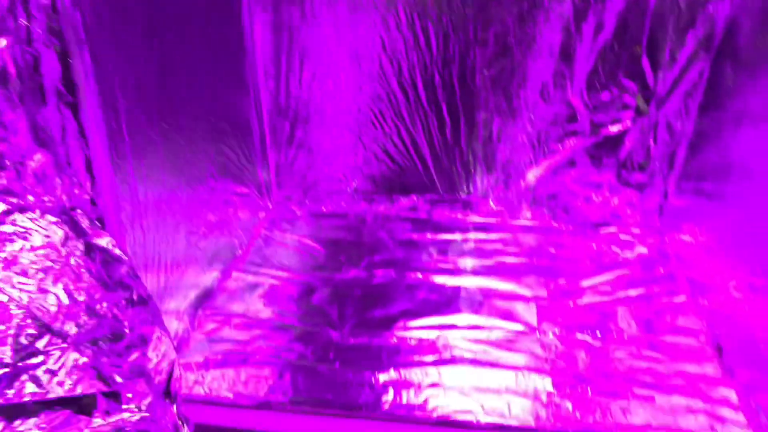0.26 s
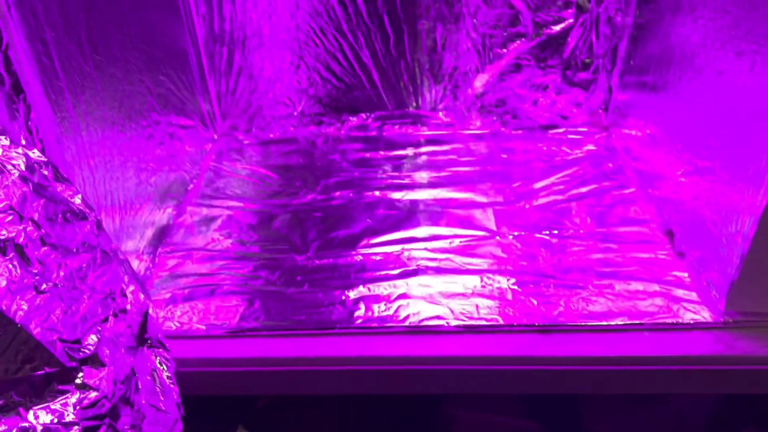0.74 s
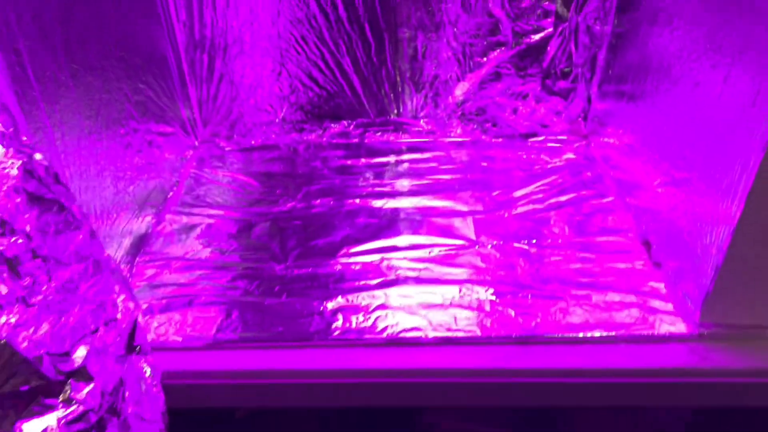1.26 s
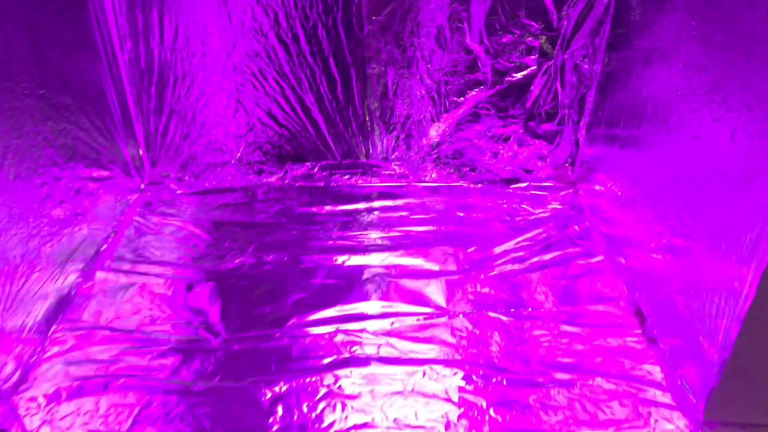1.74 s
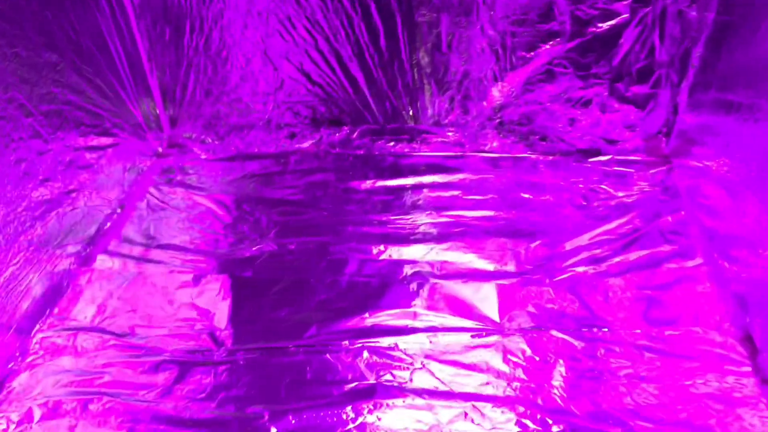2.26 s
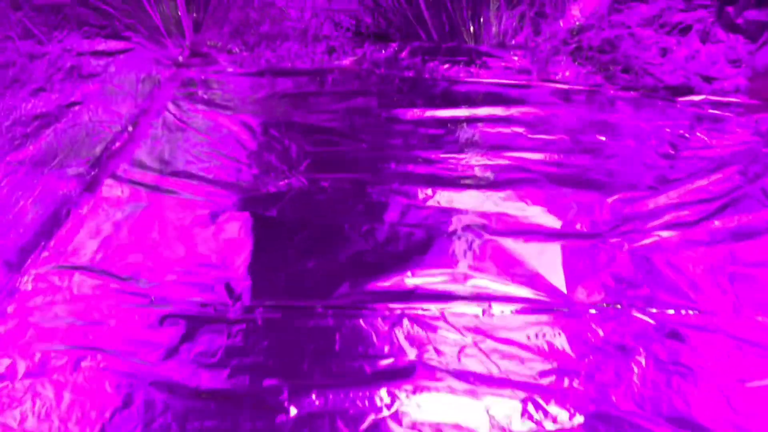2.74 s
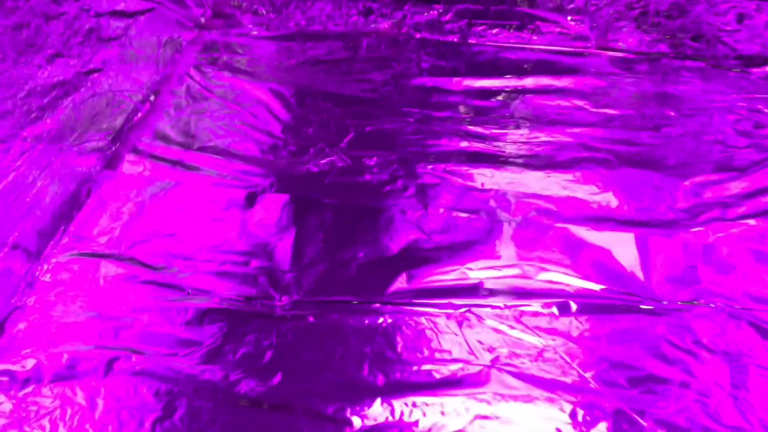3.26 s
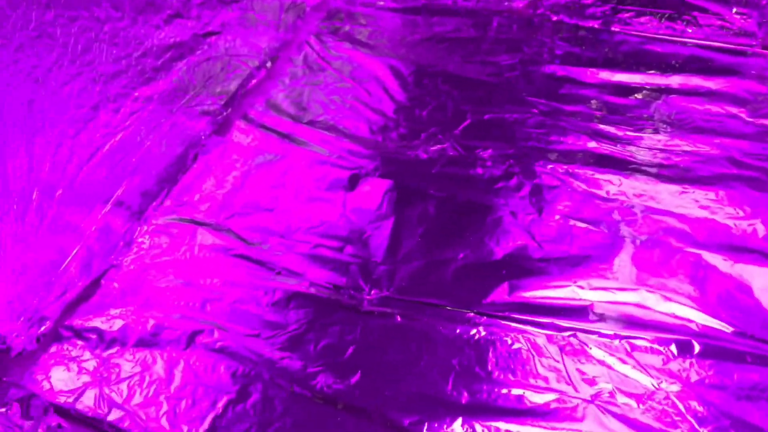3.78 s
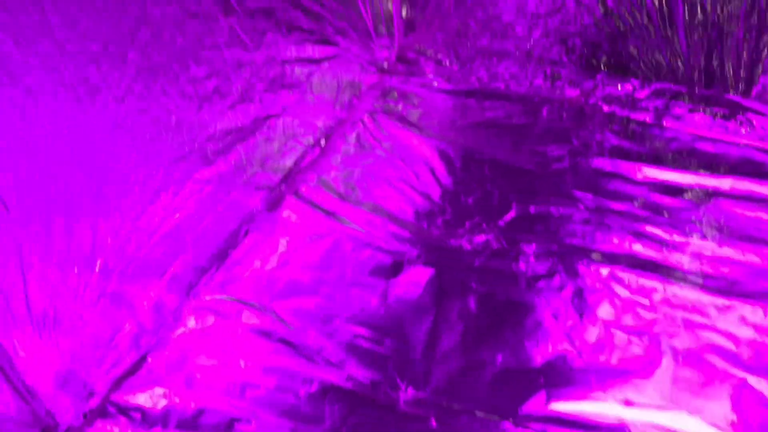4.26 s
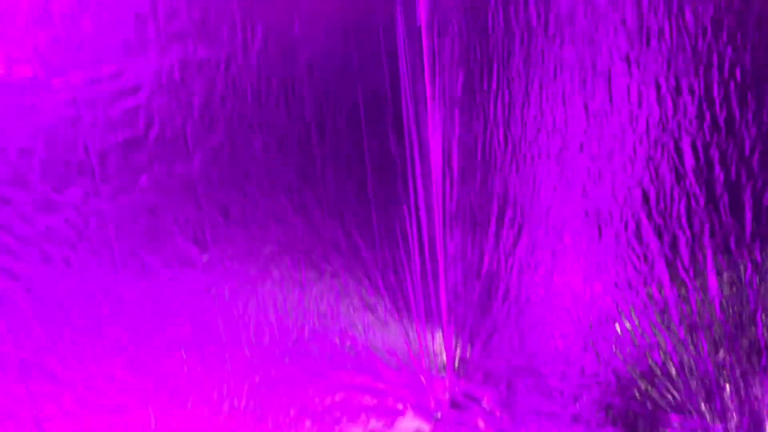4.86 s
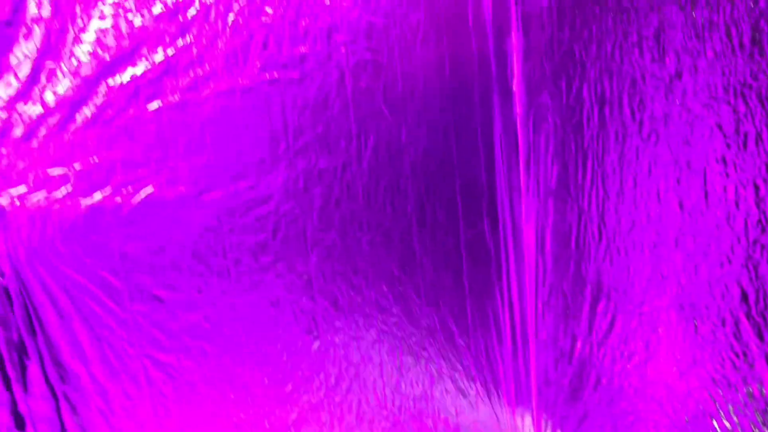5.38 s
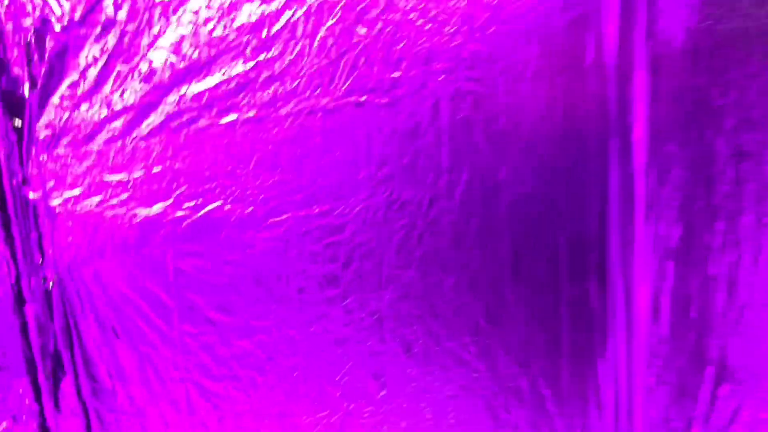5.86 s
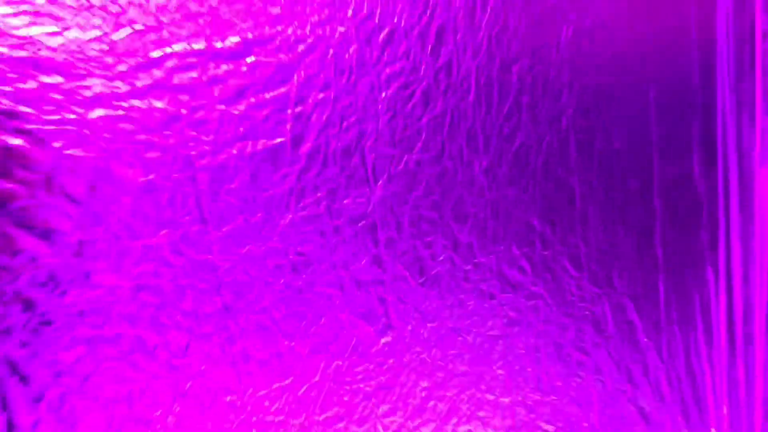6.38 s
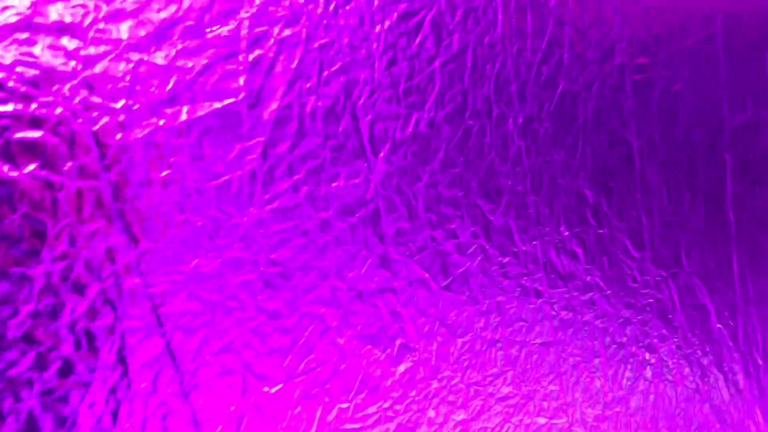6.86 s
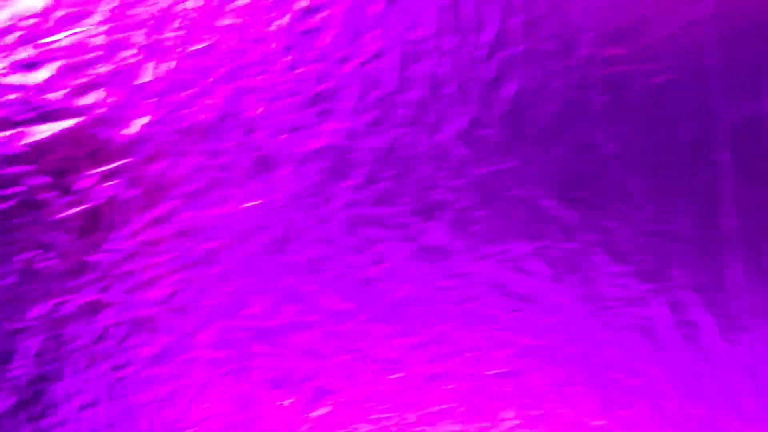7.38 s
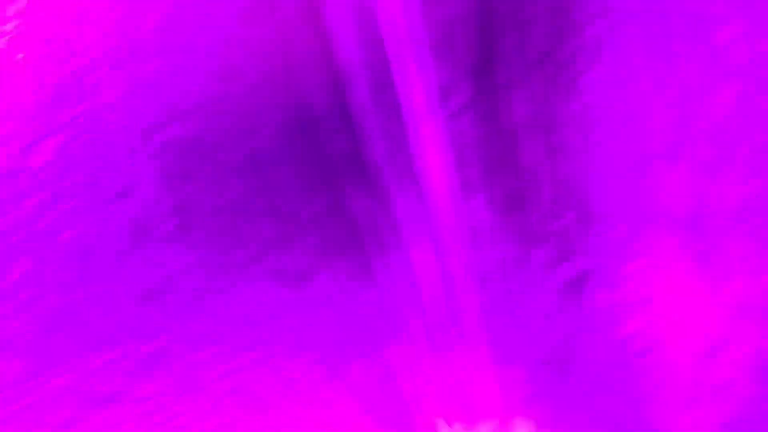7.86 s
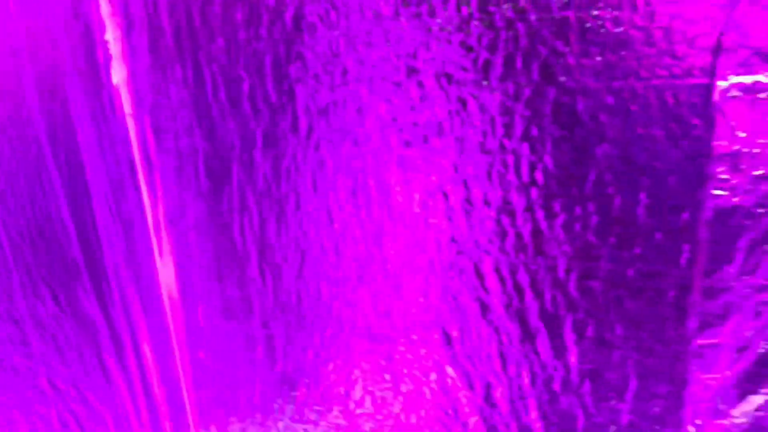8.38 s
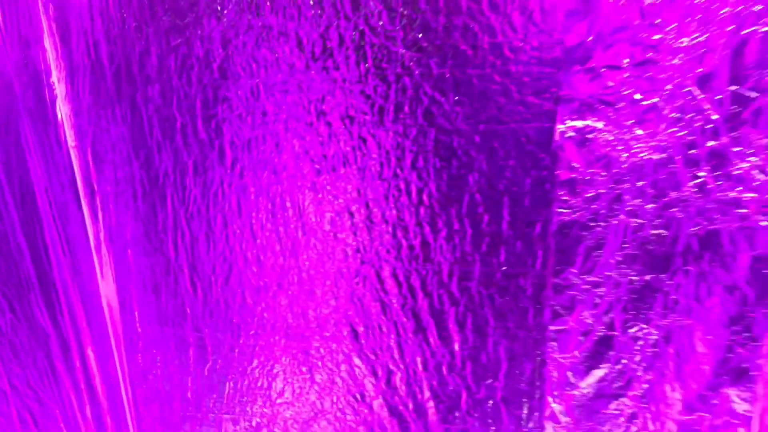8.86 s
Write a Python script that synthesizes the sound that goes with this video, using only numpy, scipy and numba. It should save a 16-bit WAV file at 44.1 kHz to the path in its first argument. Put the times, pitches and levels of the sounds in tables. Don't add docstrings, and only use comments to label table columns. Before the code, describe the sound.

Thin foil crumples loudly right at the start, alongside a dull bump of the box wall, with crisp high clicks over continuous rustle. Near three seconds come rougher, midrange scrapes, then looser crackles that fade away. Later there are only sparse snaps, small rubs and faint low knocks between near-silent gaps. The close indoor pickup has a small boxy reflection and a low bed of hiss.

```python
import sys
import numpy as np
from scipy import signal
from scipy.fft import rfft, irfft
from scipy.io import wavfile
from scipy.ndimage import uniform_filter1d, map_coordinates
from numba import njit

SR = 44100
rng = np.random.default_rng(int(sys.argv[2]) if len(sys.argv) > 2 else 0)


def boost(x):
    u = np.asarray(x, float) / 20
    return 10 ** u


def dump(signal):
    limited = np.clip(np.atleast_2d(signal).T, -1, 1)
    pcm = np.round(limited * 32767).astype(np.int16)
    wavfile.write(sys.argv[1], SR, pcm)


N = 402633

# f/Hz, level/dB
HISS_COLOUR = [(18, -42), (30, -1.5), (103, -4), (285, -13.5), (381, -12.5), (521, -15), (977, -17),
               (1060, -16.5), (3010, -23), (3720, -21.5), (15700, -28.5)]
# t/s, level under 250 Hz/dB
WALL_BUMPS = [
    (0.0, -60),
    (0.07, -52.5),
    (0.69, -62.5),
    (4.47, -74.5),
    (6.79, -71),
    (6.84, -60),
    (6.97, -70),
    (9.13, -76),
]
# f/Hz, level/dB
THUD_COLOUR = [(18, -76), (30, -13), (65, 2), (102, -4), (135, -3.5), (200, -4.5), (367, -9), (400, -15),
               (520, -12), (880, -120)]
# t/s, length/s, f/Hz, level/dB
PANEL_BOOMS = [
    (.03, 0.89, 69.4, -60.5),
    (.04, 0.27, 137.4, -55.5),
    (2.39, 0.11, 81.4, -60.5),
    (3.4, 0.084, 70, -61),
    (5.15, 0.53, 99.9, -69),
    (6.33, 0.13, 74, -61.5),
    (6.32, 0.124, 155, -66.5),
    (6.81, 0.13, 53, -59),
    (6.81, 0.073, 140, -56.5),
]
BAND_SPLITS = (1200, 3500, 8000)
BAND_TRIMS = (-2.18, -1.35, -0.096, 1)
# t/s, length/s, f/Hz, level/dB
FINGER_SCRAPES = [(2.79, 0.023, 940, -44.5), (2.791, 0.043, 1720, -44), (2.811, 0.046, 2140, -42),
                  (2.812, 0.03, 1560, -46), (2.852, .06, 1850, -49), (2.387, 0.13, 220, -68),
                  (2.81, 0.15, 322, -65), (3.443, 0.024, 1700, -54.5), (6.62, .035, 2050, -65),
                  (7.906, 0.075, 2330, -73), (7.91, 0.11, 4300, -69), (7.968, .04, 6000, -70),
                  (2.819, 0.12, 584, -50.5), (2.83, .03, 2200, -60), (2.885, 0.036, 1740, -51),
                  (3.159, 0.051, 1320, -50), (3.405, 0.03, 1670, -51), (5.081, 0.035, 930, -58),
                  (5.119, 0.031, 1170, -53), (6.028, 0.044, 6500, -53), (6.018, 0.088, 4000, -63),
                  (6.344, 0.043, 915, -63), (6.522, 0.062, 2050, -62), (6.533, 0.029, 3860, -61),
                  (7.947, 0.031, 1390, -61.5), (7.975, 0.019, 4600, -63), (7.976, 0.03, 880, -60),
                  (8.136, 0.049, 645, -64), (2.869, 0.066, 1180, -49), (5.287, 0.017, 1000, -65),
                  (6.812, 0.034, 1700, -65), (7.977, 0.04, 404, -65.5), (8.18, 0.031, 2350, -53.5),
                  (8.392, 0.037, 1000, -63.5), (6.492, 0.047, 1690, -68.5), (2.801, .12, 780, -57),
                  (6.336, 0.027, 640, -67), (6.35, 0.038, 500, -73), (3.4, 0.057, 331, -60.5),
                  (3.663, 0.036, 310, -61), (8.178, 0.047, 3100, -60)]
# t/s, level over half a millisecond/dB, ring f/Hz
CREASE_CLICKS = [(0.3971, -32, 14000), (0.4155, -31, 5900), (0.4978, -33, 3800), (0.5641, -32, 12200),
                 (0.5997, -37, 3300), (0.6342, -23, 8900), (0.7145, -31, 12400), (0.789, -27, 13900),
                 (0.8373, -39, 9100), (0.98, -23, 12100), (1.0847, -31, 8600), (1.2361, -31, 6100),
                 (1.2432, -31, 12500), (1.8756, -36, 8900), (1.9347, -38, 1900), (1.9504, -39, 12900),
                 (2.0145, -43, 5400), (3.0549, -43, 2800), (3.3095, -48, 14600), (3.3297, -49, 4600),
                 (3.3682, -39, 8800), (3.4109, -34, 1600), (3.4641, -37, 2100), (3.5598, -35, 5700),
                 (3.6654, -48, 2700), (3.7531, -48, 5400), (3.8026, -52, 3400), (3.8196, -30, 5400),
                 (3.8418, -41, 9000), (3.8776, -42, 3700), (3.8814, -46, 1600), (3.8956, -48, 4900),
                 (3.9389, -45, 4600), (3.9589, -48, 5300), (3.9642, -53, 3600), (3.9742, -47, 9300),
                 (3.9778, -49, 3000), (3.9911, -43, 4500), (4.0584, -45, 12200), (4.1327, -55, 5900),
                 (4.3201, -48, 3600), (4.861, -54, 15200), (5.2185, -39, 9700), (5.2463, -45, 9300),
                 (6.01, -50, 6300), (6.0155, -42, 6200), (6.0274, -37, 6300), (6.0343, -39, 6400),
                 (6.2203, -46, 5900), (6.8239, -50, 3000), (6.8452, -46, 4300), (7.1712, -55, 3000),
                 (7.2684, -49, 4500), (7.3702, -55, 6100), (7.438, -50, 12400), (7.4846, -33, 3000),
                 (8.1105, -37, 8400), (8.1806, -41, 2900), (8.3371, -59, 5400), (8.3579, -53, 3400)]
# t/s, peak level/dB, ring f/Hz, relative middle level/dB, relative sizzle level/dB
PUSH_SNAPS = [(0.0358, -20, 2800, -16, -2), (0.126, -20, 11530, -24, -4), (0.414, -31, 5800, -3, -15),
              (0.534, -28, 9420, -20, -12), (0.5638, -25, 12100, -22, -14), (0.6336, -20, 8500, -17, -8),
              (0.7137, -24.5, 12200, -21, -13), (0.7885, -25.5, 1910, -11, -8.5),
              (0.837, -34, 9550, -30, -19), (0.9799, -20, 3380, -16.5, -8), (1.084, -32, 8900, -16, -10),
              (1.2355, -24.5, 10400, -28, -11), (1.517, -24, 5500, -17, -8), (1.523, -31, 4500, -17, -12),
              (1.8387, -26, 2940, -22.5, -12), (1.8755, -36, 11000, 4, -1), (1.9499, -28.5, 1300, -11, -10),
              (2.041, -31.5, 4350, -12, -12), (2.245, -29, 4040, -4, -12), (2.405, -18.5, 3840, -16, -6),
              (2.4923, -26, 1580, -11, -7), (2.641, -26.5, 2610, -12, -10), (2.677, -28, 2860, -12, -5),
              (2.717, -29.5, 2770, -39, -12)]
# t/s, peak level/dB, ring f/Hz, relative middle level/dB, relative sizzle level/dB
EASE_SNAPS = [(3.054, -42, 2900, -28, -13), (3.1637, -30, 1480, -11, -1), (3.3678, -31.5, 4520, -15, -15),
              (3.4105, -31.5, 1500, 5, -16), (3.4627, -29, 3100, -24, -14), (3.5304, -37, 6400, -21, -12),
              (3.5599, -28.5, 5640, -9.5, -19), (3.6489, -39, 1770, 0, -4), (3.665, -38, 5020, -2, -13),
              (3.7524, -37.5, 1420, -17, -14), (3.813, -35, 5570, -28, -24.5),
              (3.8189, -20.5, 6760, -14.5, -15.5), (3.842, -34, 8200, -15, -19),
              (3.878, -37, 8500, -20, -7), (3.896, -44, 4500, -21, -13), (3.9374, -41, 2470, -5, -17),
              (3.9593, -38, 5400, -13, -15), (3.975, -35.5, 6400, -21, -14), (3.989, -36.5, 1440, -28, -15),
              (4.0578, -35, 3370, -21, -11), (4.132, -48.5, 5640, -26, -11),
              (4.3203, -42.5, 3180, -22.5, -12), (4.861, -49, 9250, -14, -10),
              (4.9523, -39, 1820, -10, -12)]
# t/s, peak level/dB, ring f/Hz, relative middle level/dB, relative sizzle level/dB
LATE_SNAPS = [(5.055, -35.5, 1520, -4, -10), (5.218, -29, 2940, -11, -10), (5.247, -37, 9236, -20, -13),
              (5.2869, -36, 2470, -3, -8), (6.0145, -34, 6400, -14, -25), (6.027, -33, 6400, -20, -24),
              (6.2194, -44, 2450, -31, -17), (6.351, -44, 8700, -26, -16), (6.6109, -41, 2850, -20, -26),
              (6.822, -40.5, 1610, 6, -18), (6.8426, -37.5, 4060, 0, -15), (7.172, -47.5, 2530, -9, -32),
              (7.267, -39.5, 4490, -28, -29), (7.424, -48, 2470, -21, -24), (7.437, -45, 7100, -18, -11),
              (7.4837, -29, 2810, -23, -12), (7.7716, -46, 3060, -13, -15), (8.1105, -31, 8450, -24, -10),
              (8.1788, -37.5, 2690, -2, -37), (8.355, -44, 1300, -15, -12), (8.395, -44, 1170, -22, -20)]
# t/s, peak level/dB, ring f/Hz
FAINT_TICKS = [(3.33, -45, 5000), (4.636, -54, 5000), (4.705, -48.5, 9100), (4.803, -50, 9700),
               (5.333, -48, 8950), (6.011, -46, 7000), (6.033, -41, 6500), (6.048, -44, 2000),
               (6.843, -43, 4500), (7.294, -57, 1500), (7.389, -56.5, 2000), (7.494, -40, 10000),
               (6.962, -47.5, 6360), (7.322, -50, 5000), (7.37, -47, 5960), (8.212, -43, 8640),
               (8.335, -49, 5830), (8.704, -51, 1400), (8.811, -53, 3500), (8.857, -54, 5000)]
# t/s, peak level/dB, ring f/Hz
SMALL_CREASES = [(.396, -39, 3130), (.4484, -29, 2160), (.469, -34, 12100), (.427, -32, 11000),
                 (.475, -30, 13000), (.489, -32, 12000), (1.332, -26, 7000), (1.649, -29, 5000),
                 (.4938, -30, 2980), (.5985, -35, 6650), (.656, -32, 7000), (.669, -38, 13000),
                 (.6923, -35, 2630), (.8609, -32, 5210), (.9188, -34, 5170), (1.1563, -32, 2800),
                 (1.209, -41, 8000), (1.243, -35, 6060), (1.4207, -26, 12900), (1.609, -37, 11000),
                 (1.6866, -32, 1230), (1.7779, -36, 6600), (1.792, -27, 5600), (1.934, -31, 2500),
                 (2.0133, -43, 1510), (2.3595, -30, 3050), (2.9705, -29, 1390), (3.077, -40, 990),
                 (3.087, -38.5, 2600), (3.119, -40, 3300), (3.272, -40, 5340), (3.362, -42, 3500),
                 (3.416, -40, 1900), (3.431, -40, 3200), (3.483, -34, 5400), (3.537, -49, 6000),
                 (3.576, -49, 6000), (6.543, -59, 4000), (6.548, -56, 3800), (6.62, -47, 3800),
                 (6.63, -45, 2000), (7.855, -51.5, 12000), (.2838, -29, 3400), (2.156, -38, 4220),
                 (2.1914, -41, 5000), (3.308, -45, 9000), (3.455, -36, 11000), (3.6, -50, 12000),
                 (3.681, -43, 8000), (3.802, -44, 4000), (3.906, -50, 10000), (3.933, -46, 5000),
                 (4.052, -50, 9100), (4.068, -42, 4540), (3.863, -40, 3000), (1.264, -28, 3000)]
# f/Hz, level/dB
FOIL_COLOUR = [(150, -5), (250, 1.5), (372, 5), (475, -3.5), (758, 2.5), (2680, 0.5), (12800, 1),
               (15700, -4.5)]
# t/s, rustle level/dB
HAND_PRESSURE = [(0.0, -45.0), (0.077, -41.6), (0.247, -48.5), (0.468, -46.2), (0.591, -50.8),
                 (0.908, -57.4), (0.968, -56.1), (0.981, -49.7), (1.263, -48.8), (1.494, -49.3),
                 (1.647, -49.3), (1.804, -51.4), (2.035, -57.6), (2.038, -53.2), (2.718, -55.3),
                 (3.031, -77.7), (4.034, -81.7), (4.186, -89.3)]
# t/s, rise per 20 dB/s, fall per 20 dB/s, level/dB, brightness/dB
HAND_SHOVES = [(0.633, 0.026, 0.224, -50.0, 5.0), (1.337, 0.25, 0.023, -49.0, 5.0),
               (1.842, 0.034, 0.017, -49.0, 0.0), (2.409, 0.064, 0.123, -43.0, 2.0),
               (2.498, 0.32, 0.028, -48.0, 1.0), (2.795, 0.006, 0.19, -45.0, -14.0),
               (2.827, 0.031, 0.033, -44, -9.0), (2.87, 0.08, 0.056, -44.5, -11.0),
               (2.9, 0.087, 0.08, -42.0, -4.0), (2.973, 0.153, 0.422, -57.0, -1.0),
               (3.018, 0.129, 0.025, -53.0, -2.0), (3.174, 0.035, 0.052, -40.0, -10.0),
               (3.279, 0.182, 0.104, -61.0, -1.0), (3.366, 0.012, 0.035, -55, -2.0),
               (3.411, 0.003, 0.08, -47, -19.0), (3.464, 0.004, 0.075, -51.0, -2.0),
               (3.558, 0.053, 0.051, -52.0, -0.0), (3.65, 0.009, 0.107, -60.0, -2.0),
               (3.705, 0.07, 0.096, -56.0, -1.0), (3.819, 0.014, 0.04, -48, 1.0),
               (3.877, 0.073, 0.047, -56.0, 2.0), (3.938, 0.009, 0.015, -56.0, 1.0),
               (3.992, 0.004, 0.04, -57.0, -1.0), (3.976, .003, .04, -60, 0),
               (4.059, 0.003, 0.04, -60.0, 2.0)]
# t/s, rise per 20 dB/s, fall per 20 dB/s, level/dB, brightness/dB
WALL_BRUSHES = [(4.861, 0.007, 0.032, -64.0, 1.0), (4.95, 0.005, 0.051, -56.0, 2.0),
                (5.062, 0.035, 0.174, -52.0, 2.0), (5.126, 0.11, 0.097, -51.0, 0.0),
                (5.186, 0.02, 0.139, -57.0, 0.0), (5.247, 0.008, 0.037, -60.0, 6.0),
                (5.289, 0.011, 0.035, -56.0, 1.0), (6.042, 0.035, 0.055, -48, -12),
                (6.219, 0.002, 0.04, -58.0, -3.0), (6.351, 0.016, 0.07, -61.0, -3.0),
                (6.487, 0.151, 2.148, -72.0, -9.0), (6.547, 0.04, 0.071, -56.0, -10.0),
                (6.622, 0.037, 0.049, -52.0, -6.0), (6.823, 0.006, 0.06, -56.0, -12.0),
                (6.844, 0.042, 0.107, -58.0, -1.0), (7.265, 0.007, 0.074, -71.0, 4.0),
                (7.443, 0.129, 0.013, -67.0, -3.0), (7.484, 0.002, 0.035, -43.5, -5.0),
                (7.912, 0.009, 0.35, -59.0, -12.0), (7.985, 0.03, 0.065, -56.5, -11.0),
                (8.109, 0.002, 0.17, -55.0, -1.0), (8.15, 0.04, 0.041, -52.0, -9.0),
                (8.181, 0.003, 0.07, -49.0, -20.0), (8.395, 0.004, 0.09, -60.0, -6.0),
                (8.357, .004, .04, -62, -2), (6.89, .03, .012, -58, 2), (6.903, .004, .04, -63, -3),
                (7.774, .003, .06, -67, -2)]
# f/Hz, width/Hz, level/dB
HOUSING_DENTS = [(4890, 1430, -2), (7590, 650, -4), (10450, 490, -6)]


def unit(x):
    return x / np.sqrt(np.mean(x ** 2))


def colour(x, table):
    hz, db = np.transpose(table)
    f = np.maximum(np.fft.rfftfreq(len(x), 1 / SR), 1)
    return irfft(rfft(x) * boost(np.interp(np.log(f), np.log(hz), db)), len(x))


def decay(t, t60):
    return 1000 ** (-t / t60)


def walk(rate):
    hold = int(SR / rate)
    levels = rng.standard_normal(N // hold + 1)
    return uniform_filter1d(np.repeat(levels, hold), hold)[:N]


def bands(x):
    f = np.fft.rfftfreq(len(x), 1 / SR)
    below = [0] + [1 / (1 + (f / hz) ** 8) for hz in BAND_SPLITS] + [1]
    return [irfft(rfft(x) * (high - low), len(x)) for low, high in zip(below, below[1:])]


def swell(t, start, length):
    x = np.clip((t - start) / length, 0, 1)
    return 3.6 * x ** 0.44 * (1 - x)


def noise_floor():
    whine_hz, first_db, slope_db = 1002.1, -85.5, -0.73
    t = np.arange(N) / SR
    whine = np.zeros(N)
    for k in range(1, 16):
        whine += boost(first_db + slope_db * k) * np.sin(2 * np.pi * (k * whine_hz * t + rng.random()))
    hiss = unit(colour(rng.standard_normal(N), HISS_COLOUR)) * boost(-68.5 + 1.5 * walk(3.6))
    return hiss + np.sqrt(2) * whine


def bumps():
    t = np.arange(N) / SR
    s, db = np.transpose(WALL_BUMPS)
    level_db = np.interp(t, s, db - 1.0) + 0.34 * walk(21)
    out = unit(colour(rng.standard_normal(N), THUD_COLOUR)) * boost(level_db)
    for start, length, hz, db in PANEL_BOOMS:
        out += boost(db) * swell(t, start, length) * np.sin(2 * np.pi * hz * (t - start))
    return out


def box(x):
    t60_s, level_db, hand_shift_per_s = .075, -10.5, 3
    t, out = np.arange(SR // 5) / SR, 0
    turn = np.pi * hand_shift_per_s * np.arange(N) / SR
    for k in range(4):
        parts = bands(rng.standard_normal(len(t)))
        tail = sum(part * decay(t, t60_s * share) for part, share in zip(parts, (2.13, 1.02, 0.82, 0.51)))
        tail *= np.minimum(t / 0.00077, 1)
        weight = np.cos(turn * (1 + k // 2 * .618) + k % 2 * np.pi / 2) / np.sqrt(2)
        out = out + signal.fftconvolve(x * weight, tail / np.sqrt(np.sum(tail ** 2)))[:N]
    return boost(level_db) * out


def scrapes():
    t, out = np.arange(N) / SR, np.zeros(N)
    for start, length, hz, db in FINGER_SCRAPES:
        i = slice(int(start * SR), int((start + length) * SR))
        band = signal.butter(2, (hz * 0.854, hz * 1.134), "band", fs=SR, output="sos")
        noise = unit(signal.sosfilt(band, rng.standard_normal(N // 40)))
        out[i] += boost(db) * swell(t[i], start, length) * noise[-len(t[i]):]
    return out


def clicks():
    rattle_s, ring_db, ring_cycles = .0004, -11, 18
    low_hz, reach = 1500, 2.2
    out, t = np.zeros(N + SR), np.arange(512) / SR
    for s, db, hz in CREASE_CLICKS:
        spike = rng.choice([-1, 1]) * (t == 0) + .4 * rng.standard_normal(len(t)) * np.exp(-t / rattle_s)
        band = signal.butter(2, (low_hz, min(reach * hz, .45 * SR)), "band", fs=SR)
        spike = signal.lfilter(*band, spike)
        spike += boost(ring_db) * np.sin(2 * np.pi * hz * t) * decay(t, ring_cycles / hz)
        i = int(s * SR)
        out[i:i + len(t)] += boost(db) * spike / np.sqrt(np.mean(spike[:22] ** 2))
    return out[:N]


def snaps():
    tick_middle_db, tick_sizzle_db = -13.5, -15
    small = [tuple(row) + (tick_middle_db, tick_sizzle_db) for row in list(FAINT_TICKS) + list(SMALL_CREASES)]
    out, t = np.zeros(N + SR), np.arange(4096) / SR
    highpass = signal.butter(2, 350, "high", fs=SR)
    for s, db, hz, mid_db, sizzle_db in list(PUSH_SNAPS) + list(EASE_SNAPS) + list(LATE_SNAPS) + small:
        t60 = 0.026 * (hz / 3000) ** -0.1
        body, mid, edge, sizzle = bands(rng.standard_normal(len(t)))
        crack = boost(mid_db + 5.5) * (mid + 0.84 * body) * decay(t, 1.6 * t60)
        crack += edge * decay(t, 0.59 * t60)
        crack += boost(sizzle_db + 7.5) * sizzle * decay(t, t60)
        crack *= 1 + .4 * np.exp(-t / 0.0006)
        crack += 0.55 * np.sin(2 * np.pi * hz * t) * decay(t, 0.5 * t60)
        crack = 12 * np.tanh(crack / 12) * np.minimum(t / .0005, 1)
        crack = signal.lfilter(*highpass, crack)
        i = int(s * SR)
        out[i:i + len(t)] += 1.17 * boost(db) * crack / np.sqrt(np.sum(crack ** 2) / (0.00077 * SR)) / 2
    return out[:N]


def hand():
    t = np.arange(N) / SR

    def tilt(db, bright_db):
        flat = 0 * db
        return np.array([-5 - 0.0558 * (db + 60.5), flat, 1.13 + 0.65 * bright_db + flat, bright_db + flat])

    steady_db = np.interp(t, *np.transpose(HAND_PRESSURE))
    power = boost(2 * (steady_db + tilt(steady_db, 0.33)))
    rustle_share_db = -1.5
    for s, rise, fall, db, bright_db in list(HAND_SHOVES) + list(WALL_BRUSHES):
        i = slice(int((s - 2 * rise) * SR), int((s + 2 * fall) * SR))
        away = np.maximum((s - t[i]) / rise, (t[i] - s) / fall)
        power[:, i] += boost(2 * (db + rustle_share_db + tilt(db, bright_db)))[:, None] / 10 ** (2 * away)
    power[0] *= boost(2 * np.where(t < 5.8, .5, -3))
    return power


def swarm(per_s, spread_db, t60, clump, bed):
    chance = rng.random((N, 2)).T
    starts = chance[0] < per_s * np.exp(clump * walk(45)) / SR
    kicks = starts * boost(-spread_db * np.log(1 - .96 * chance[1]))
    power = signal.lfilter([1], [1, -decay(1 / SR, t60)], kicks ** 2)
    return kicks, np.sqrt(power + bed * np.mean(power)) * rng.standard_normal(N)


@njit
def rings(at, hz, t60, size, n):
    y = np.zeros(n)
    for k in range(len(at)):
        p = np.exp(2j * np.pi * hz[k] / SR - np.log(1000) / (t60[k] * SR))
        z = size[k] + 0j
        for i in range(at[k], min(n, at[k] + int(t60[k] * SR))):
            z *= p
            y[i] += z.imag
    return y


def patches(x):
    depth_db, life_s, width_octaves = 1.4, .035, .6
    f, t, z = signal.stft(x, SR, nperseg=512)
    spots = rng.standard_normal((60, 400))
    at = np.meshgrid(np.log2(1 + f / 100) / width_octaves, t / life_s, indexing="ij")
    drift_db = depth_db * map_coordinates(spots, at, mode="mirror")
    return signal.istft(z * boost(drift_db), SR, nperseg=512)[1][:N]


def crumple():
    asked = np.sqrt(hand())
    push = np.clip((asked[1] * boost(55)) ** .6, .4, 2.0)
    kicks, bursts = swarm(800 * push, spread_db=3.5, t60=.014, clump=.45, bed=.3)
    at = np.flatnonzero(kicks)
    ticks = np.diff(kicks, prepend=0)
    chance = rng.random((len(at), 2)).T
    hz = 500 * 2 ** (4.9 * chance[0])
    ring_s = (12 + 40 * chance[1]) / hz
    facets = rings(at, np.minimum(hz, .4 * SR), ring_s, kicks[at], N)
    buckles = unit(bursts) + boost(-14.5) * unit(facets) + boost(-5.0) * unit(ticks)
    foil, out = patches(colour(buckles, FOIL_COLOUR)), 0
    for part, gain, trim_db in zip(bands(foil), asked, BAND_TRIMS):
        mean_power = uniform_filter1d(part ** 2, int(0.035 * SR), mode="reflect")
        out = out + part / np.sqrt(mean_power + 1e-12) * gain * boost(trim_db)
    return out


def scene():
    foil = crumple() + snaps() + clicks() + scrapes()
    return (foil + box(foil) + bumps() + noise_floor())[None]


def roll_off(x):
    return signal.sosfilt(signal.butter(12, 17010, fs=SR, output="sos"), x)


def record(dry):
    f = np.fft.rfftfreq(N, 1 / SR)
    dents_db = sum(db / (1 + (2 * (f - hz) / width) ** 2) for hz, width, db in HOUSING_DENTS)
    response = boost(dents_db) * (f < 15750) / (1 + (36 / (f + 1)) ** 4)
    mix = irfft(rfft(dry) * response, N)
    return roll_off(mix)


dry = scene()
out = record(dry)
dump(out)
```